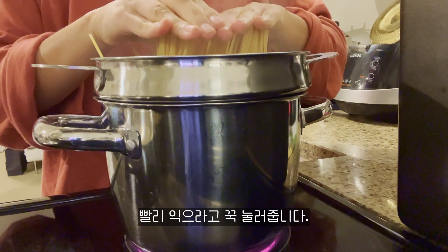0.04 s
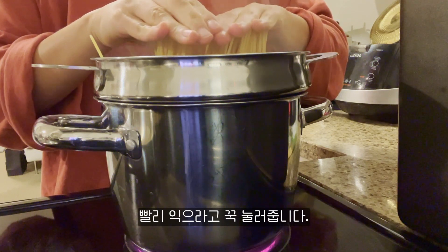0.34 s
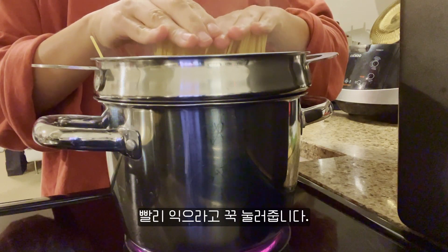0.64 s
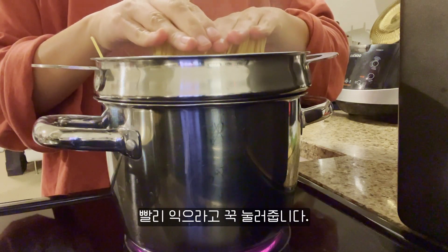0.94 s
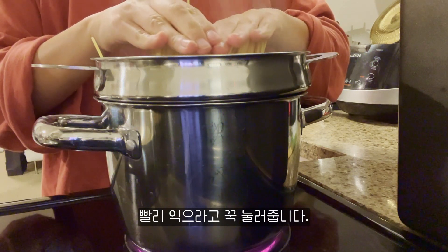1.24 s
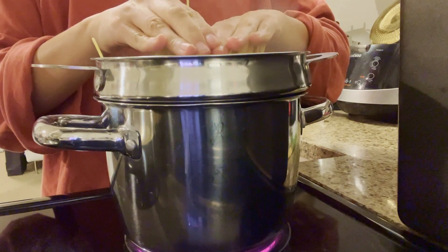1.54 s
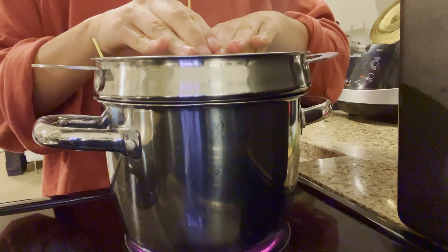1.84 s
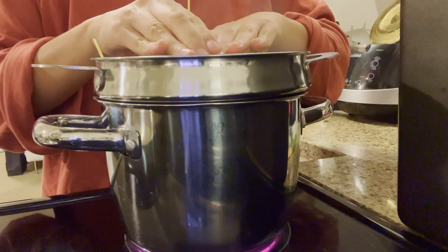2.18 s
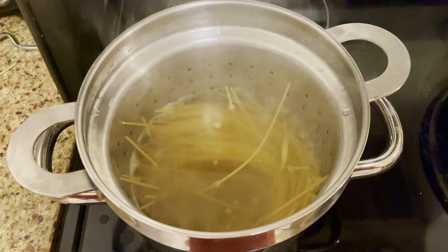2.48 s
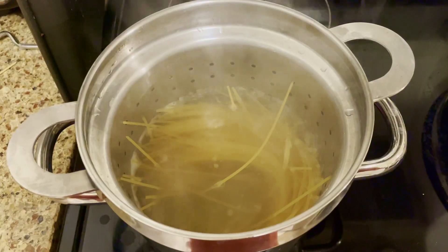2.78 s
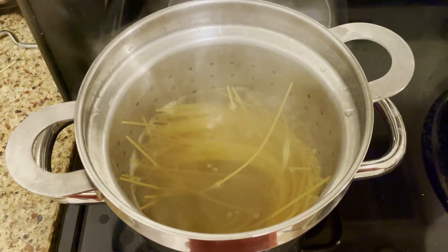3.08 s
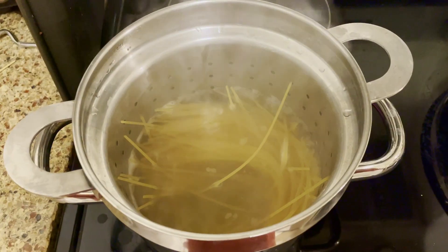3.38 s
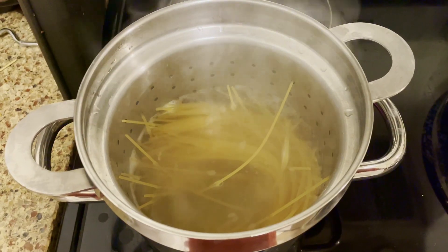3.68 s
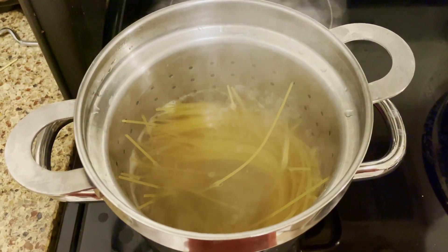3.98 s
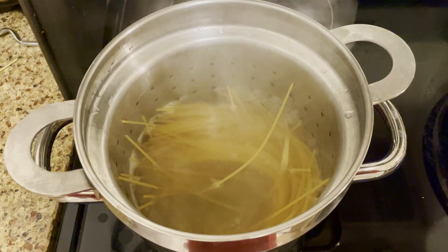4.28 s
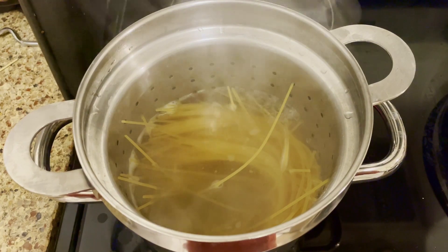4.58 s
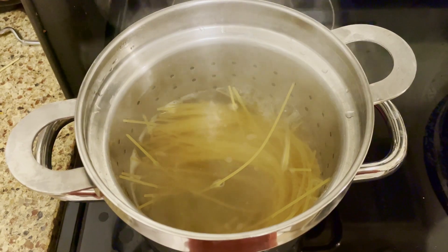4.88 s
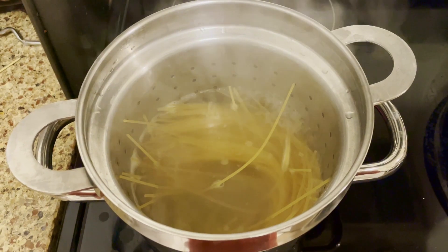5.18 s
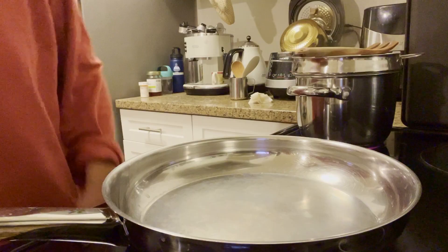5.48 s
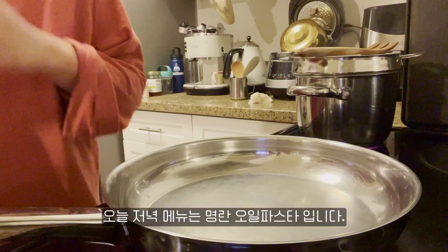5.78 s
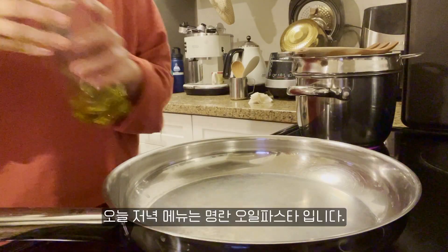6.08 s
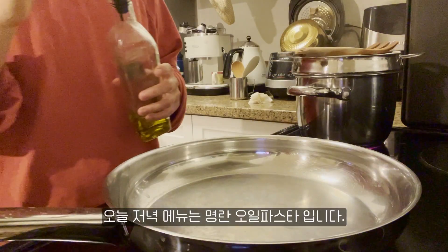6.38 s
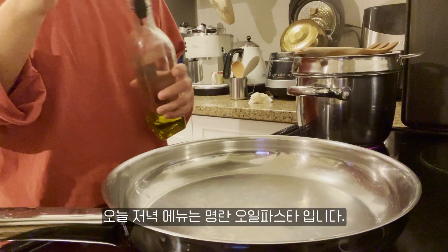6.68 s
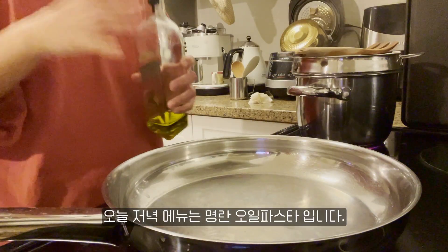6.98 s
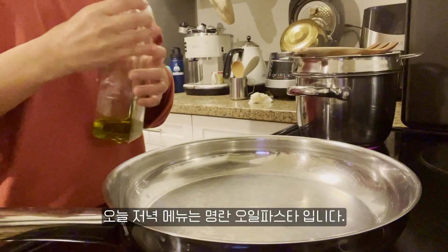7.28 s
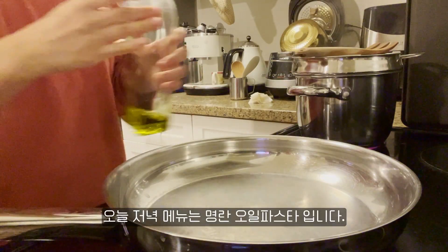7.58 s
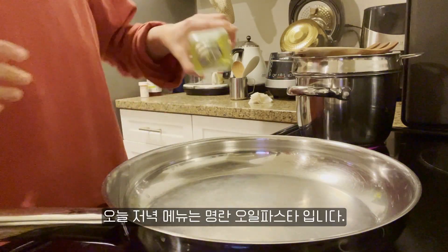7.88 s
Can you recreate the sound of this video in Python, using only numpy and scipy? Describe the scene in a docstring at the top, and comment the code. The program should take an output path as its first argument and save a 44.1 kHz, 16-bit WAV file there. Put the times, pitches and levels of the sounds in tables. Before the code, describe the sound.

A pot rumbles with faint ticks of dry pasta, bubbles up close, then simmers across a kitchen as a bottle cap clinks.

```python
"""Cooking spaghetti, heard from three places in a kitchen, one abruptly after the other.
First, beside the steel pot, the hob hums, the boil rumbles through the wall, and dry strands rub and
tick as hands press them down. Then, above the pot, water churns and bubbles burst: each film snaps, its
cavity resonates, and the steel walls echo. Last, from across the kitchen, the pot simmers on while a
metal cap scrapes and clinks on a glass oil bottle, exciting the modes of both."""
import sys
import numpy as np
from scipy import signal
from scipy.fft import rfft, irfft
from scipy.io import wavfile
from scipy.ndimage import uniform_filter1d

SR = 44100
rng = np.random.default_rng(int(sys.argv[2]) if len(sys.argv) > 2 else 0)


def wav_out(sig):
    """Save sig, one row per channel (or a flat mono array), as 16-bit PCM at SR to the path in sys.argv[1]."""
    wavfile.write(sys.argv[1], SR, np.round(np.clip(np.atleast_2d(sig).T, -1, 1) * 32767).astype(np.int16))


N = 350149
T = np.arange(N) / SR
BESIDE_END_S, ABOVE_START_S, ABOVE_END_S = 2.486, 2.528, 5.482

# Table levels are relative: each source applies its own gain.
# stereo image at each place: side minus mid, then left minus right (frequency [Hz], level [dB])
BESIDE_IMAGE = [(60, -8), (200, -16), (400, -2.5), (700, 2.5), (2400, 0.5), (15000, -4)]
BESIDE_PAN = [(60, -4), (200, -3), (380, -5.5), (700, -4), (2400, 0), (15000, -1.5)]
ABOVE_IMAGE = [(60, -15), (200, -12), (700, -3.5), (1300, -8), (4400, 2), (15000, -4.5)]
ABOVE_PAN = [(60, -0.5), (300, 0.5), (700, 5.5), (3000, -1.5), (15000, 0)]
FAR_IMAGE = [(60, -32), (110, -4), (200, -10), (380, -11), (700, 3), (1290, -1), (2380, 2.5), (4400, -0.5),
             (8120, -5), (15000, 2)]
FAR_PAN = [(60, -0.5), (110, -5), (200, -8.5), (380, -3), (700, -3.5), (1290, -0.5), (2380, 0.5),
           (4400, -2.5), (8120, -1), (15000, 1)]
# lead of left over right for bursts heard above the pot (frequency [Hz], phase [rad])
ABOVE_LEAD = [(20, 0), (2330, .25), (3190, 1.3), (4050, .2), (5250, .4), (6290, -1.1)]

# mains hum of the hob (frequency [Hz], level [dB])
HUM_PARTIALS = [(59.2, -50), (118.4, -48)]
# the boil through the wall, a broad tilt on it, and the rubbing of strands (frequency [Hz], level [dB])
WALL_SPECTRUM = [(15, -43), (25, -32), (49, -6.5), (145, -1.5), (223, 0.5), (416, -11.5), (503, -20),
                 (591, -41), (734, -30), (1160, -31.5), (6740, -48), (9320, -41.5), (12200, -65),
                 (14800, -44), (16000, -64)]
WALL_TILT = [(30, 3), (60, -.5), (120, 2.5), (250, -.5), (600, 8), (1200, 5), (5000, 6.5), (16000, -5)]
RUB_SPECTRUM = [(300, -14), (650, 18), (850, -1.5), (1300, 4), (2000, -3.5), (4500, -11), (10000, -52)]
# pot modes driven by the boil and by the rubbing (frequency [Hz], width [Hz], level [dB])
WALL_MODES = [(81, 15, -3), (106.3, 5.1, -0.5), (170, 6.2, 1.5), (226.2, 31.6, 5), (291.7, 12, -0.5),
              (367, 20, -7.5), (406.5, 2.4, -12), (579, 8.1, -12.5), (667, 34, -14.5)]
RUB_MODES = [(1190, 35, 0), (1400, 30, -5), (1510, 30, -4), (1785, 30, -3), (1990, 45, -2), (2312, 25, -5),
             (2785, 30, -4), (2920, 35, -4), (3270, 35, -5), (3950, 50, -4), (4328, 15, -2), (4510, 25, -6)]
# hands pushing the pasta down (time [s], duration [s], rise in level [dB])
PUSHES = [(0.47, 0.23, 4.5), (0.682, 0.054, 2), (0.974, 0.41, 6)]
# dry strands slipping and snapping (time [s], level [dB], centre [Hz], width [Hz])
STRAND_TICKS = [(.054, -43, 2650, 503), (.463, -45.5, 4040, 1500), (.466, -43, 1600, 1700),
                (.478, -44, 1700, 1600), (.51, -50, 1800, 1500), (.676, -46, 650, 300),
                (.678, -51, 1900, 1200), (.838, -51.5, 2050, 700), (.991, -48, 1970, 700),
                (1.078, -51, 2400, 3500), (1.12, -48.5, 2270, 800), (1.206, -51, 1800, 900),
                (1.608, -36.5, 9200, 990), (1.6085, -46, 3200, 2500), (1.609, -45, 14600, 1800),
                (1.622, -48, 7000, 7000), (2.258, -49, 1690, 900), (2.448, -43, 8000, 980)]

# vigour of the boil, and the pot's low boom near 200 Hz (time [s], level [dB])
BOIL_LEVEL = [(2.54, -51), (2.81, -50), (2.9, -46), (2.98, -57), (3.17, -60), (3.3, -58), (3.45, -55.5),
              (3.54, -52), (3.72, -57), (3.91, -54), (3.97, -47), (4.02, -53.5), (4.12, -51.5),
              (4.2, -55.5), (4.36, -54), (4.46, -57), (4.56, -54.5), (4.62, -51), (4.7, -53), (4.88, -45.5),
              (5.03, -52), (5.15, -53.5), (5.37, -47.5), (5.47, -57)]
BOOM_LEVEL = [(2.54, -61), (2.66, -49.5), (2.92, -65), (2.99, -56), (3.11, -58), (3.18, -50.5),
              (3.62, -59.5), (3.71, -49.5), (4.06, -56), (4.07, -46.5), (4.38, -51.5), (4.45, -59),
              (4.73, -52.5), (4.77, -64), (4.8, -50.5), (4.94, -45.5), (5.13, -57), (5.26, -42.5),
              (5.31, -54.5), (5.47, -60)]
# churning water (frequency [Hz], level [dB])
CHURN_SPECTRUM = [(25, -38.5), (55, 9), (120, -1), (250, -1), (400, -6), (750, -13.5), (1200, -17),
                  (3000, -28), (6000, -34), (7800, -39), (10500, -30), (13000, -46), (16000, -69.5)]
# modes driven by the churn; standing waves between the walls (frequency [Hz], width [Hz], level [dB])
BOOM_MODES = [(202, 8.5, 2.5), (593.4, 6.6, -11.5), (743, 98, -8.5)]
STANDING_WAVES = [(593, 32, -3), (770, 60, -6), (845, 35, -10), (1045, 25, -10), (1220, 45, -6),
                  (1351, 38, -7), (1481, 27, -2), (1699, 50, -10), (2025, 60, -8), (2538, 35, -3),
                  (2863, 38, -5), (3170, 90, -8), (3700, 20, -8), (4044, 40, -8), (5300, 120, -7),
                  (6200, 300, -4)]
# drops spat against the steel (time [s], level [dB], centre [Hz], width [Hz])
SPITS = [(2.655, -42.5, 9900, 4000), (2.7395, -37, 9800, 3000), (2.8405, -35, 5500, 1100),
         (3.478, -42.5, 9500, 3500), (3.6486, -38, 5000, 1300), (3.819, -39.5, 6100, 700),
         (4.0599, -38, 4900, 900), (4.2512, -36.5, 5350, 900), (4.8428, -25, 6280, 401),
         (4.8431, -26.5, 9950, 1900), (4.94, -40, 9400, 3500), (5.0485, -41, 4870, 1100),
         (5.112, -51, 10000, 4000), (5.238, -44, 10000, 4000)]
# collapsing patches of foam (time [s], duration [s], level [dB], pitch [Hz])
FOAM_PATCHES = [(2.68, 0.069, -59, 3070), (2.756, 0.026, -58, 2660), (2.825, 0.083, -62, 3000),
                (2.901, 0.054, -60, 3170), (3.403, 0.013, -60, 2970), (3.493, 0.034, -66, 2880),
                (3.537, 0.041, -62, 1900), (3.564, .035, -70, 3100), (3.675, 0.041, -56.5, 3120),
                (3.766, 0.012, -58, 4770), (3.779, 0.036, -58, 2200), (3.874, 0.036, -57.5, 2530),
                (4.14, 0.043, -61, 2540), (4.396, 0.024, -54, 2380), (4.5, 0.02, -56, 2480),
                (4.857, 0.039, -50, 3100), (5.269, 0.076, -63, 2900), (5.375, 0.061, -64, 3240)]
# wide bubbles heaving up (time [s], level [dB], pitch [Hz])
GULPS = [(2.548, -35, 450), (2.567, -36, 420), (2.761, -34, 460), (2.898, -37, 470), (2.925, -38, 440),
         (3.001, -39, 440), (3.66, -38, 480), (3.89, -32, 490), (3.962, -34, 480), (3.988, -37, 450),
         (4.149, -36, 450), (4.258, -36, 520), (4.394, -37, 430), (4.588, -38, 470), (4.637, -38, 420),
         (4.844, -37, 470), (4.895, -37, 460), (5.07, -36, 440), (5.217, -34, 460), (5.299, -37, 470),
         (5.313, -37, 420), (5.357, -37, 450), (5.373, -38, 490), (5.388, -37, 510)]
# the biggest bursts (time [s], cavity level [dB], cavity pitch [Hz], snap level [dB], snap pitch [Hz])
BIG_BUBBLES = [(2.5469, -35, 770, -42, 4000), (2.5628, -44, 1030, -34, 3050), (2.5745, -35, 770, -39, 1650),
               (2.5923, -30, 830, -43, 1800), (2.6278, -39, 1370, -43, 2550), (2.6509, -30, 830, -44, 1500),
               (2.6746, -45, 580, -39, 3050), (2.6995, -42, 580, -33, 3050), (2.7102, -32, 830, -38, 1500),
               (2.722, -41, 670, -38, 2550), (2.7266, -27, 830, -42, 4000), (2.757, -36, 960, -33, 3050),
               (2.7597, -27, 830, -39, 2800), (2.8005, -50, 720, -34, 2550), (2.8262, -38, 770, -33, 2350),
               (2.8375, -35, 960, -35, 2350), (2.8407, -39, 1470, -29, 4400), (2.8788, -28, 890, -27, 2350),
               (2.8907, -29, 720, -38, 2550), (2.8968, -33, 1470, -39, 4000),
               (2.9084, -35, 1580, -34, 3050), (2.9242, -31, 720, -38, 3050), (2.9458, -35, 960, -40, 2800),
               (2.948, -35, 1030, -38, 1500), (3.0005, -34, 770, -40, 1950), (3.0048, -50, 960, -37, 2150),
               (3.01, -44, 770, -36, 2800), (3.0139, -41, 620, -36, 2150), (3.1028, -37, 670, -44, 2350),
               (3.11, -46, 670, -37, 2550), (3.1192, -44, 620, -37, 3050), (3.2329, -33, 830, -47, 3650),
               (3.2438, -39, 670, -38, 3650), (3.3332, -33, 830, -39, 3050), (3.4047, -43, 1030, -40, 2150),
               (3.4185, -43, 1030, -36, 2150), (3.4269, -33, 720, -47, 4800), (3.4874, -46, 890, -40, 2550),
               (3.4948, -41, 720, -37, 2800), (3.5058, -39, 1580, -42, 2800),
               (3.5296, -39, 1190, -35, 1800), (3.5453, -35, 1280, -38, 2800),
               (3.5473, -37, 1370, -37, 2800), (3.622, -46, 1190, -38, 3050), (3.624, -39, 620, -31, 3350),
               (3.6486, -35, 1700, -31, 4800), (3.6688, -41, 960, -40, 2800), (3.6784, -40, 890, -36, 2800),
               (3.69, -40, 1580, -41, 2550), (3.7414, -38, 830, -39, 4400), (3.7563, -42, 1470, -36, 4800),
               (3.7817, -44, 1700, -39, 4400), (3.7873, -30, 890, -39, 1500), (3.8346, -42, 830, -39, 2150),
               (3.8671, -47, 1110, -39, 2800), (3.8754, -54, 1700, -40, 2550),
               (3.9511, -39, 890, -36, 1500), (3.9532, -36, 830, -35, 2350), (3.9586, -33, 830, -36, 1800),
               (3.9615, -29, 670, -25, 1500), (3.9713, -27, 770, -33, 1500), (3.9736, -35, 890, -34, 2150),
               (3.9858, -37, 890, -31, 2350), (4.06, -50, 1190, -26, 3350), (4.0643, -33, 1030, -33, 2550),
               (4.1119, -48, 720, -42, 2150), (4.127, -54, 1700, -37, 2800), (4.1347, -37, 720, -42, 2350),
               (4.1412, -43, 580, -37, 2150), (4.1481, -32, 770, -33, 1950), (4.1554, -39, 720, -39, 2350),
               (4.1734, -41, 1030, -42, 2800), (4.2034, -44, 960, -37, 4000), (4.2419, -33, 770, -42, 1650),
               (4.3015, -38, 770, -40, 2550), (4.3329, -42, 720, -36, 2350), (4.3563, -43, 770, -40, 1950),
               (4.3937, -40, 890, -34, 2550), (4.3985, -45, 830, -34, 2350), (4.4006, -29, 830, -43, 2150),
               (4.4273, -39, 670, -35, 2350), (4.4448, -39, 830, -44, 2350), (4.4868, -40, 960, -41, 1950),
               (4.491, -38, 770, -37, 2150), (4.5025, -37, 670, -35, 2150), (4.5225, -40, 770, -41, 2800),
               (4.5262, -50, 770, -32, 2350), (4.5804, -38, 830, -32, 2800), (4.5875, -34, 830, -38, 2350),
               (4.6024, -28, 960, -26, 1800), (4.6154, -39, 770, -34, 2150), (4.6388, -45, 890, -38, 2550),
               (4.6533, -37, 1700, -42, 2550), (4.6873, -45, 960, -35, 2350), (4.7198, -37, 890, -32, 2350),
               (4.7595, -45, 580, -39, 2550), (4.7669, -45, 1030, -40, 1650), (4.7717, -35, 830, -31, 2150),
               (4.778, -30, 770, -38, 2550), (4.7802, -26, 720, -48, 2550), (4.8017, -35, 960, -30, 2150),
               (4.8053, -30, 1190, -35, 3650), (4.8245, -34, 1470, -33, 3650),
               (4.8431, -33, 580, -20, 3350), (4.8522, -39, 580, -36, 3050), (4.855, -37, 720, -34, 2800),
               (4.8598, -34, 720, -28, 3050), (4.8761, -33, 890, -30, 2150), (4.9038, -24, 890, -31, 2800),
               (4.9131, -24, 890, -29, 2550), (4.929, -24, 1190, -24, 2800), (4.9869, -42, 580, -39, 2800),
               (4.9951, -38, 830, -32, 2350), (5.0072, -39, 830, -43, 2150), (5.0166, -36, 830, -44, 1500),
               (5.0363, -36, 1700, -45, 4400), (5.0455, -35, 720, -39, 1950), (5.0485, -44, 720, -35, 4400),
               (5.0702, -30, 770, -54, 4800), (5.1121, -37, 620, -36, 1650), (5.1926, -54, 1700, -39, 2800),
               (5.1961, -35, 1030, -45, 2150), (5.2161, -28, 890, -25, 3050), (5.2483, -41, 830, -36, 2550),
               (5.2533, -35, 830, -38, 1950), (5.2601, -33, 830, -41, 2800), (5.2875, -42, 890, -39, 1800),
               (5.2995, -32, 670, -38, 2550), (5.3136, -36, 890, -38, 2800), (5.3543, -38, 580, -31, 2550),
               (5.3737, -23, 670, -43, 3650), (5.3785, -54, 1700, -36, 2800), (5.3882, -26, 830, -33, 3050),
               (5.3916, -33, 890, -35, 2800), (5.4015, -34, 670, -37, 2800)]

# the simmer from across the kitchen (time [s], level [dB])
SIMMER_LEVEL = [(5.52, -59.5), (5.66, -60.5), (5.75, -61.5), (5.88, -57), (6.06, -57), (6.22, -59.5),
                (6.39, -59), (6.47, -61.5), (6.56, -65), (6.62, -61), (6.69, -61), (6.82, -62),
                (6.94, -60.5), (7.01, -62), (7.1, -59), (7.24, -61), (7.4, -58), (7.52, -62.5), (7.65, -60),
                (7.8, -59.5), (7.92, -59)]
# its steady wash and its bursts (frequency [Hz], level [dB])
SIMMER_SPECTRUM = [(15, -60), (25, -15.5), (80, -4.5), (170, -12), (256, -11.5), (285, 5), (363, -13.5),
                   (463, -0.5), (516, -9), (560, -9.5), (1020, -17.5), (1230, -34.5), (1480, -11),
                   (1610, -23), (16000, -53.5)]
FAR_POP_SPECTRUM = [(250, -20), (500, 2.5), (1000, -2), (1250, -7.5), (1600, -5), (2300, -10),
                    (3500, -17.5), (8000, -45.5)]
# modes of the distant pot (frequency [Hz], width [Hz], level [dB])
SIMMER_MODES = [(226.5, 4.5, -4), (295, 8, -7), (400.6, 11, -7), (472, 33, 2), (560, 11, -7), (696, 16, 0),
                (745, 12, -7), (865, 12, -12.5), (934, 11, -11.5), (1011, 12, -7.5), (1150, 25, -10),
                (1483, 57, 0.5), (1720, 40, -10), (2077, 30, -13.5), (2367, 77, -11.5)]
# big bubbles knocking in it (time [s], level [dB], cavity pitch [Hz])
KNOCKS = [(5.624, -45, 480), (5.683, -49.5, 458), (5.794, -52, 660), (5.859, -52, 1000), (5.918, -55, 700),
          (5.992, -53, 1400), (6.015, -53, 1500), (6.038, -54, 1900), (6.053, -51, 800),
          (6.071, -49.5, 690), (6.103, -55, 1500), (6.122, -56, 1100), (6.198, -49, 700), (6.238, -58, 480),
          (6.388, -52, 480), (6.581, -52.5, 493), (6.864, -50.5, 1450), (6.936, -53, 1430),
          (7.069, -52, 480), (7.108, -49, 1380), (7.128, -55, 900), (7.188, -53, 1450), (7.288, -52, 480),
          (7.374, -54, 1000), (7.408, -50, 605), (7.6, -54, 1500), (7.648, -50.5, 1490), (7.733, -51, 700),
          (7.86, -51, 1500)]
# the cap touching the bottle (time [s], cap level [dB], glass level [dB])
CAP_TOUCHES = [(6.047, -69, -82), (6.203, -73, -86), (6.7328, -42.5, -45), (6.7655, -34, -54),
               (6.769, -44, -59), (7.187, -72, -76), (7.209, -63.5, -69), (7.398, -56.5, -72),
               (7.679, -70, -64), (7.725, -80, -69), (7.79, -73, -80), (7.866, -53.5, -69)]
# the cap's bright scrape (frequency [Hz], level [dB])
SCRAPE_SPECTRUM = [(1500, -21), (4000, -7.5), (5700, -15), (7500, -8), (8600, -0.5), (9600, 2), (10700, 1),
                   (12400, -17), (13500, -3), (15200, -6), (16000, -20)]
# modes of the metal cap and of the glass neck (frequency [Hz], level [dB], t60 [s])
CAP_MODES = [(8220, -29, .1), (8630, -28, .1), (9078, -28, .14), (10299, -31, .2), (10377, -25, .18),
             (10449, -30, .16), (10633, -28, .16), (13500, -25, .08), (13900, -28, .11), (14600, -25, .09),
             (15490, -27, .1)]
NECK_MODES = [(1620, -9, .05), (1733, -8, .07), (2030, -18, .1), (2400, -21, .1), (3560, -19, .06),
              (3795, -19, .2), (3940, -16, .1), (4050, -17, .14), (4170, -18, .12), (4380, -18, .11),
              (4856, -25, .14), (5170, -24, .1), (6600, -17, .04), (7150, -21, .1)]


def undb(db):
    """Amplitude ratio of a level in decibels."""
    return 10 ** (np.asarray(db) / 20)


def unit(x):
    """Normalisation to an rms of 1."""
    return x / np.sqrt(np.mean(x ** 2))


def curve(rows):
    """Linear interpolation of (time [s], level [dB]) points at every sample."""
    return np.interp(T, *np.transpose(rows))


def freqs(size=N):
    """Fourier frequencies [Hz] of a signal of this many samples."""
    return np.arange(size // 2 + 1) * SR / size


def slope(points, f=freqs()):
    """Spectral envelope: the gain of (frequency [Hz], level [dB]) points joined in log frequency."""
    hz, db = np.transpose(points)
    return undb(np.interp(np.log(f + 1), np.log(hz), db))


def peaks(modes, f=freqs()):
    """Resonance: the gain of steep-skirted modes whose powers add."""
    return np.sqrt(sum(undb(2 * db) / width / (1 + 2 * ((f - hz) / width) ** 2) ** 2
                       for hz, width, db in modes))


def noise(gain, image, pan):
    """Filtered noise, spread in stereo by mid and side signals; the channel mean has an rms of 1."""
    mid, side = rfft(rng.standard_normal((2, N))) * gain
    side, lean = side * slope(image), np.sqrt(slope(pan))
    out = irfft(np.array([(mid + side) * lean, (mid - side) / lean]), N)
    return out / np.std(out.mean(0))


def wander(rate_hz):
    """Slow modulation: smoothed random steps with an rms of 1."""
    hold = int(SR / rate_hz)
    steps = np.repeat(rng.standard_normal(N // hold + 1), hold)
    return unit(uniform_filter1d(uniform_filter1d(steps, hold), hold)[:N])


def window(start, end):
    """A time gate with 3 ms ramps."""
    return np.clip(np.minimum(T - start, end - T) / .003, 0, 1)


def add(out, s, sound):
    """Superposition of a sound onto out at s seconds."""
    i = max(int(s * SR), 0)
    out[..., i:i + sound.shape[-1]] += sound[..., :max(N - i, 0)]


def impact(gain_at, decay_s, tail_db, tail_t60):
    """Direct sound and reverberation: a crack, one sample later on the right, then a diffuse tail."""
    t = T[:16384]
    coloured = unit(irfft(rfft(rng.standard_normal((3, len(t)))) * gain_at(freqs(len(t)))))
    crack = coloured[0] * np.exp(-t / decay_s)
    crack *= np.sqrt(decay_s * SR / 2 / np.sum(crack ** 2))
    tail = coloured[1:] * undb(tail_db - 60 * t / tail_t60)
    return (np.array([crack, np.roll(crack, 1)]) + tail) / 2


def ticks(rows, decay_s, tail_db, tail_t60):
    """Impulsive excitation: small contacts, each ringing in its own band."""
    out = np.zeros((2, N))
    for s, db, hz, width in rows:
        add(out, s, undb(db) * impact(lambda f: peaks([(hz, width, 0)], f), decay_s, tail_db, tail_t60))
    return out


def struck(modes):
    """Free vibration: damped modes, each reaching the two ears out of phase."""
    t = T[:SR // 2]
    return sum(undb(db - 60 * t / t60) * np.sin(2 * np.pi * hz * t + rng.uniform(-1.5, 1, (2, 1)))
               for hz, db, t60 in modes)


def between_ears(x, lead):
    """Interaural phase difference, varying with frequency."""
    hz, radians = np.transpose(lead)
    turn = np.interp(np.log(freqs() + 1), np.log(hz), radians)
    return irfft(rfft(x) * np.exp(1j * turn * np.array([[.5], [-.5]])), N)


def in_pot(x, echo_db, echo_t60, room_db, room_t60):
    """Reflection: quick echoes between the steel walls, their standing waves, then the kitchen."""
    t = T[:13000]
    echoes, room = (rng.standard_normal((2, len(t))) * undb(-60 * t / t60) * (t > .0005)
                    for t60 in (echo_t60, room_t60))
    ring = sum(undb(db) * 2 * np.pi * width / SR * np.cos(2 * np.pi * hz * t)
               * np.exp(-np.pi * width * t) for hz, width, db in STANDING_WAVES)
    response = ring + (undb(echo_db) * unit(echoes) + undb(room_db) * unit(room)) / np.sqrt(len(t))
    return x + signal.fftconvolve(x, response, axes=1)[:, :N]


def hob_hum():
    """Forced vibration at the mains frequency and its second harmonic."""
    return sum(undb(db) * np.sqrt(2) * np.sin(2 * np.pi * (hz * T + rng.random()))
               for hz, db in HUM_PARTIALS)


def wall_rumble(push_db):
    """Transmission: the boil passes through the wall, whose modes swell a little with each push."""
    body = noise(slope(WALL_SPECTRUM) * slope(WALL_TILT), BESIDE_IMAGE, BESIDE_PAN)
    ring = noise(peaks(WALL_MODES), BESIDE_IMAGE, BESIDE_PAN)
    return undb(-46) * body + undb(-44.5 + .16 * push_db) * ring


def patter(count, size_db, smear_s):
    """Shot noise: an envelope of random energy pulses, each rounded and smeared; its rms is 1."""
    at = rng.integers(0, N, count)
    pulse_db = size_db * np.minimum(rng.exponential(size=count), 3)
    energy = np.bincount(at, undb(2 * pulse_db), N)
    for seconds in (smear_s, smear_s / 4):
        energy = signal.lfilter([1], [1, -np.exp(-1 / (seconds * SR))], energy)
    return unit(np.sqrt(energy))


def distant_simmer():
    """Amplitude modulation: distant bursts feed the pot's modes, so both flicker together over a wash."""
    wash = undb(-5) * noise(slope(SIMMER_SPECTRUM), FAR_IMAGE, FAR_PAN)
    ring = undb(-4.5) * noise(peaks(SIMMER_MODES), FAR_IMAGE, FAR_PAN)
    pops = undb(-9.5) * noise(slope(FAR_POP_SPECTRUM), FAR_IMAGE, FAR_PAN)
    flicker = patter(count=1300, size_db=2, smear_s=.009)
    return (wash + (ring + pops) * flicker) * undb(curve(SIMMER_LEVEL))


def distant_knocks():
    """Selective excitation: a big bubble drives the pot's modes that lie near its own pitch."""
    out = np.zeros((2, N))
    for s, db, hz in KNOCKS:
        def colour(f):
            return (peaks(SIMMER_MODES, f) + peaks([(1500, 1500, -9.5)], f)) * peaks([(hz, hz, 0)], f)
        knock = impact(colour, decay_s=.012, tail_db=-10.5, tail_t60=.27)
        soft_attack = np.minimum(T[:knock.shape[1]] / .0015, 1) ** 2
        add(out, s, undb(db + 1) * knock * soft_attack)
    return out


def churning_water():
    """Broadband excitation: the water's wavering noise, and the low boom it drives in the pot."""
    churn = noise(slope(CHURN_SPECTRUM), ABOVE_IMAGE, ABOVE_PAN) * undb(-49 + 1.2 * wander(25.37))
    boom = noise(peaks(BOOM_MODES), ABOVE_IMAGE, ABOVE_PAN) * undb(curve(BOOM_LEVEL))
    return churn + boom


def rubbing_strands(push_db, softening_db_per_s=1.8):
    """Stick-slip friction: strands rub in quick jerks, exciting the pot, and quieten as they soften."""
    modes = peaks(RUB_MODES)
    pot_colour = 1 + undb(3) * modes / modes.max()
    friction = noise(pot_colour * slope(RUB_SPECTRUM), BESIDE_IMAGE, BESIDE_PAN)
    jerks = patter(count=1500, size_db=2.9, smear_s=.004)
    return friction * undb(-62 - softening_db_per_s * T + push_db) * jerks


def bottle_cap():
    """Modal ringing: each touch scrapes, and sets the metal cap and the glass neck vibrating."""
    out = np.zeros((2, N))
    for s, cap_db, glass_db in CAP_TOUCHES:
        scrape = impact(lambda f: slope(SCRAPE_SPECTRUM, f), decay_s=.0026, tail_db=-12, tail_t60=.23)
        add(out, s, undb(cap_db) * (scrape + struck(CAP_MODES)[:, :scrape.shape[1]]))
        add(out, s, undb(glass_db) * struck(NECK_MODES))
    return out


def foam(bursts_per_s, octaves, cycles):
    """Incoherent summation: a patch of foam collapses in tiny damped bursts around its own pitch."""
    out, t = np.zeros((2, N)), T[:400]
    for s, length, db, hz in FOAM_PATCHES:
        patch = np.zeros((2, SR // 4))
        for when, height, size, left in rng.random((120, 4))[:int(bursts_per_s * length) + 1]:
            turns = hz * 2 ** (octaves * (2 * height - 1)) * t
            ring = np.sin(2 * np.pi * turns) * np.exp(-turns / cycles)
            add(patch, when * length, size ** 2 * np.sqrt([[.5 + left], [1.5 - left]]) * ring)
        add(out, s - length / 2, patch * undb(db) * np.sqrt(2 * length * SR / np.sum(patch ** 2)))
    return out


def submerged_bubbles(count, pitch_hz, octaves, cycles, size_db):
    """Volume pulsation: tiny bubbles ring under the surface, rising a little in pitch."""
    out, t = np.zeros((2, N)), T[:1300]
    for when, height, size, left in rng.random((count, 4)):
        hz = pitch_hz * 2 ** (octaves * (height - .5))
        age = t * hz / cycles
        ring = np.sin(2 * np.pi * hz * t * (1 + .014 * age)) * np.exp(-age)
        gain = undb(-size_db * np.sqrt(size)) * np.sqrt([[left], [1 - left]])
        add(out, ABOVE_START_S + when * (ABOVE_END_S - ABOVE_START_S), gain * ring)
    return out


def cavity(hz, cycles=1.45, fall=.6, opening_s=.0004):
    """Cavity resonance: a burst bubble swings a few times, sinking in pitch as it collapses."""
    t = T[:700]
    turns = hz * (t + fall * opening_s * (1 - np.exp(-t / opening_s))) / (1 + fall / 4)
    swings = cycles * np.sqrt(800 / hz)  # deep cavities ring for more cycles than shallow ones
    return np.sin(2 * np.pi * turns) * np.exp(-t * hz / swings) * (1 - np.exp(-8 * turns))


def film_snap(hz, delay_s):
    """Rupture transient: a bubble's film snaps in a swing or two."""
    turns = hz * np.maximum(T[:700] - delay_s, 0)
    return np.sin(2 * np.pi * turns) * 2 * turns * np.exp(1 - 2 * turns)


def gulps():
    """Low cavity resonance: wide bubbles heave the surface without a snap."""
    out = np.zeros((2, N))
    for s, db, hz in GULPS:
        add(out, s, undb(db - 4) * cavity(hz, cycles=1.5))
    return out


def bursting_bubbles(rows, pan_db, spread_db):
    """Rupture and resonance at random places on the water; the columns are those of BIG_BUBBLES."""
    out = np.zeros((2, N))
    for s, cavity_db, cavity_hz, snap_db, snap_hz in rows:
        place, tear = rng.random(2)
        lean = undb((pan_db + spread_db * (2 * place - 1)) * np.array([[.5], [-.5]]))
        snap = undb(snap_db) * film_snap(snap_hz, delay_s=.0005 * tear)
        add(out, s, lean * (undb(cavity_db) * cavity(cavity_hz) + snap))
    return out


def small_bubbles(count, pitch_hz, octaves, size_db, snap_db, snap_hz):
    """Exponential level distribution: most bursts are faint; higher ones have less cavity, more snap."""
    times = rng.uniform(ABOVE_START_S, ABOVE_END_S, count)
    height = np.clip(octaves * rng.standard_normal(count), -.8, 2.2)
    db = size_db * np.minimum(rng.exponential(size=count), 2.2)
    snap_pitch = snap_hz * 2 ** rng.uniform(-1, 1, count)
    rows = np.transpose([times, db - 1.3 * height, pitch_hz * 2 ** height,
                         db + snap_db + 1.3 * height, snap_pitch])
    out = bursting_bubbles(rows, pan_db=2, spread_db=6)
    return out / np.std(out[:, (T > ABOVE_START_S) & (T < ABOVE_END_S)])


def medium_bubbles(boil_db, count, pitch_hz, octaves, snap_hz):
    """Steam flux: one burst per equal share of steam, so a harder boil gives more, and louder ones."""
    chance = rng.random(count)
    size, height, tear, film = rng.standard_normal((count, 4)).T.clip(-1.4, 1.4)
    steam = np.cumsum(undb(boil_db) * window(ABOVE_START_S, ABOVE_END_S))
    at = np.searchsorted(steam, steam[-1] * (np.arange(count) + chance) / count)
    growth_db = .5 * (boil_db[at] - boil_db[at].mean())
    cavity_db = -44 + growth_db + 2 * size
    snap_db = -45 + growth_db + (tear + height) / 2
    rows = np.transpose([at / SR, cavity_db, pitch_hz * 2 ** (octaves * height),
                         snap_db, snap_hz * 2 ** (.35 * film)])
    return bursting_bubbles(rows, pan_db=5, spread_db=10)


def boiling_surface(wet_top_hz=6450):
    """Sources in an enclosure: bubbles of all sizes echo in the pot, while drops tick on the steel."""
    boil_db = curve(BOIL_LEVEL)
    small = small_bubbles(count=1200, pitch_hz=860, octaves=.82, size_db=2.5, snap_db=-3.5, snap_hz=3050)
    submerged = submerged_bubbles(count=520, pitch_hz=2600, octaves=2, cycles=6, size_db=15)
    crowd = undb(boil_db - 2.5) * small + undb(boil_db + 8) * submerged
    medium = medium_bubbles(boil_db, count=70, pitch_hz=780, octaves=.6, snap_hz=2910)
    big = undb(-1.6) * bursting_bubbles(BIG_BUBBLES, pan_db=3, spread_db=3)
    spits = ticks(SPITS, decay_s=.0013, tail_db=-15.5, tail_t60=.087)
    spray = undb(-1.5) * foam(bursts_per_s=1100, octaves=.65, cycles=1.3)
    lowpass = signal.butter(12, wet_top_hz, fs=SR, output="sos")  # wet bursts have little treble
    bursts = between_ears(signal.sosfilt(lowpass, crowd + medium + big + spray + gulps()), ABOVE_LEAD)
    return spits + in_pot(bursts, echo_db=-12, echo_t60=.028, room_db=-10.5, room_t60=.08)


def scene():
    """Superposition at three listening places in turn: beside the pot, above it, across the kitchen."""
    push_db = sum(db * np.exp(-(2 * (T - s) / length) ** 2) for s, length, db in PUSHES)
    beside = hob_hum() + wall_rumble(push_db) + rubbing_strands(push_db)
    beside += ticks(STRAND_TICKS, decay_s=.006, tail_db=-16, tail_t60=.31)
    above = churning_water() + boiling_surface()
    across = distant_simmer() + distant_knocks() + bottle_cap()
    return (beside * window(0, BESIDE_END_S) + above * window(ABOVE_START_S, ABOVE_END_S)
            + across * window(ABOVE_END_S, np.inf))


def record(dry):
    """Band limiting: a steep low-pass removes the treble above 15.9 kHz."""
    return signal.sosfilt(signal.ellip(8, .2, 70, 15900, fs=SR, output="sos"), dry)


dry = scene()
out = record(dry)
wav_out(out)
```